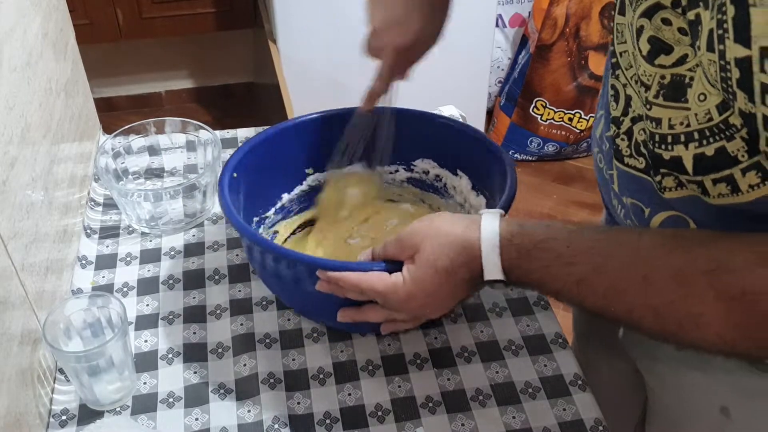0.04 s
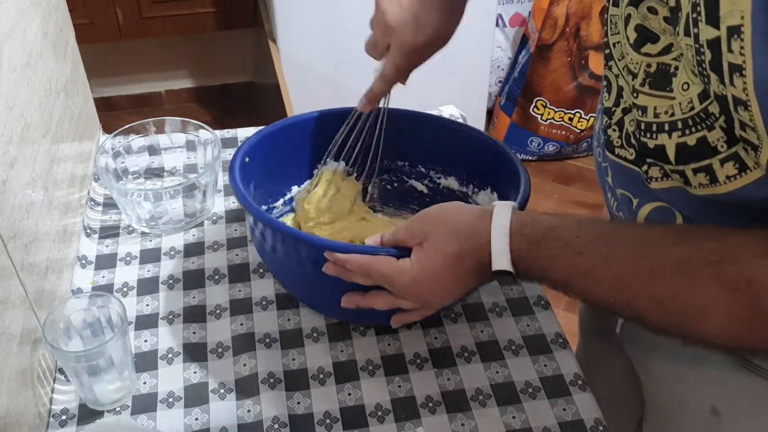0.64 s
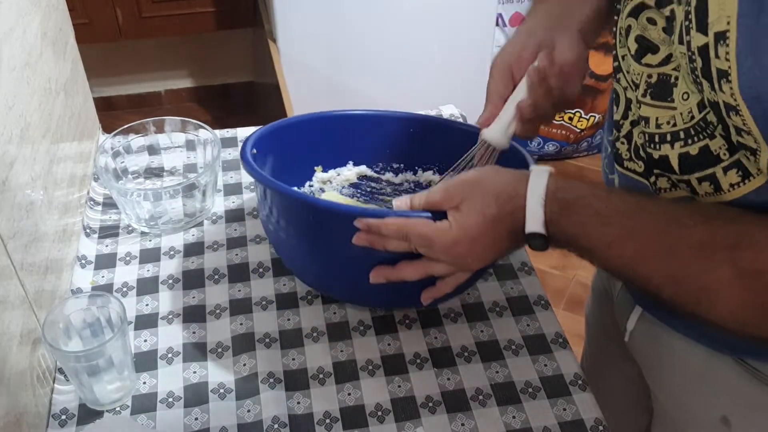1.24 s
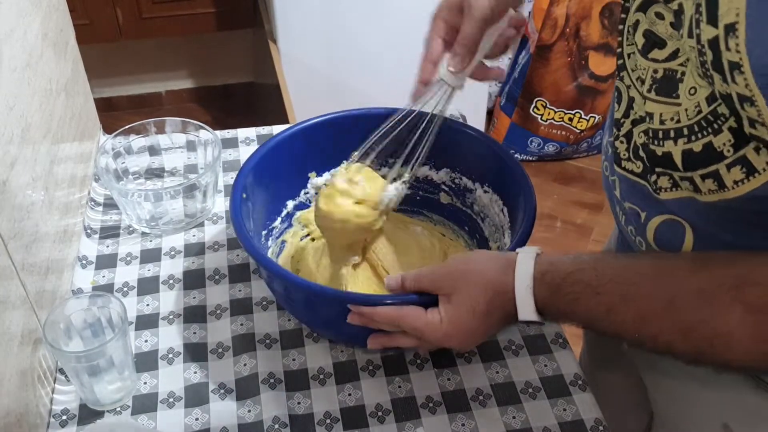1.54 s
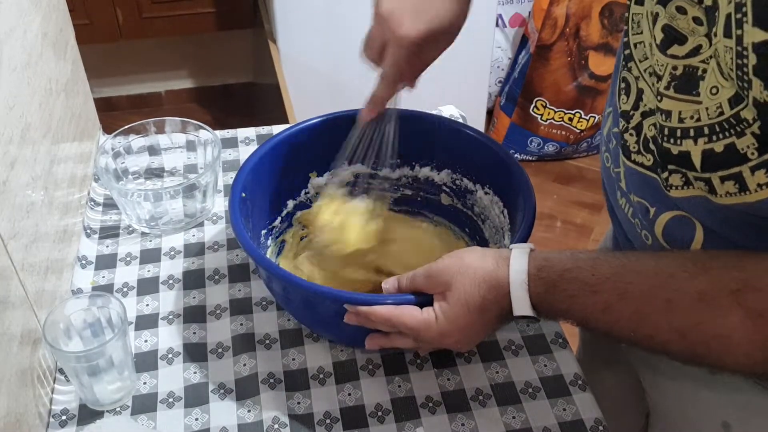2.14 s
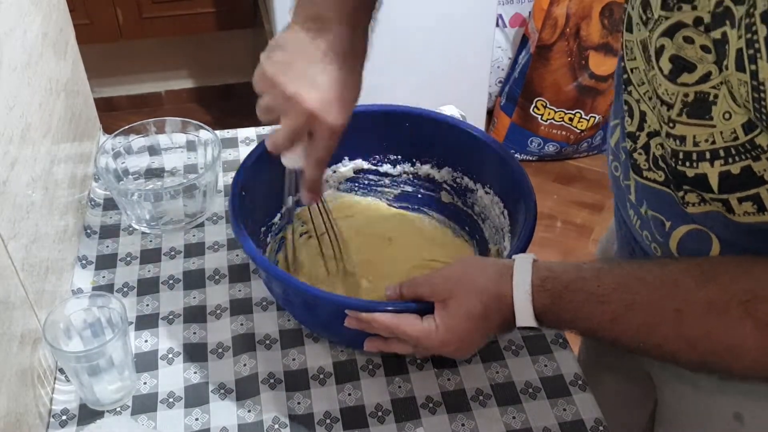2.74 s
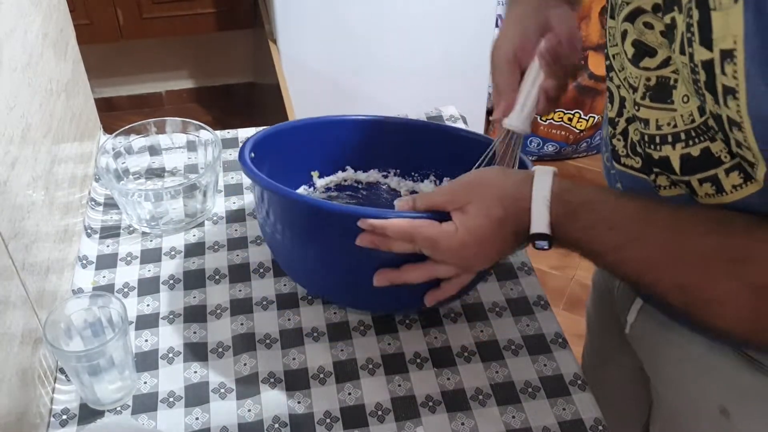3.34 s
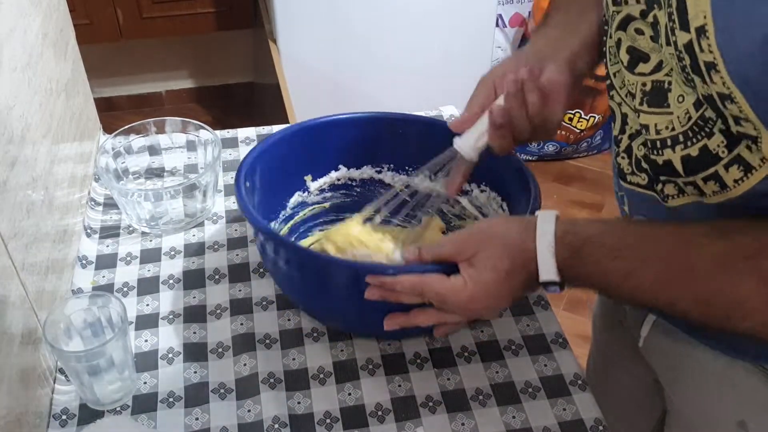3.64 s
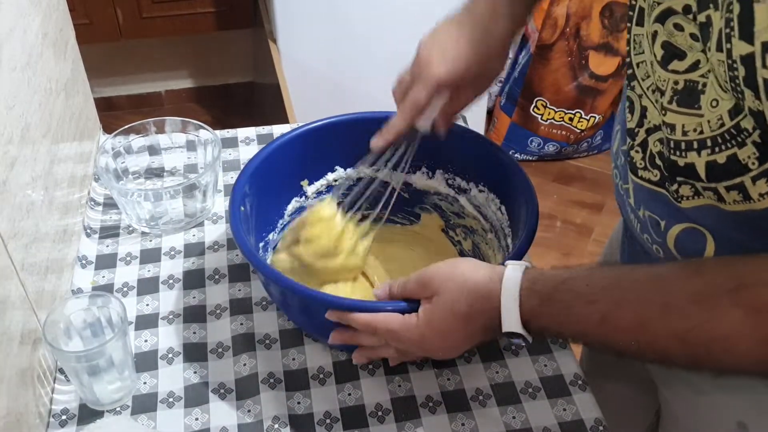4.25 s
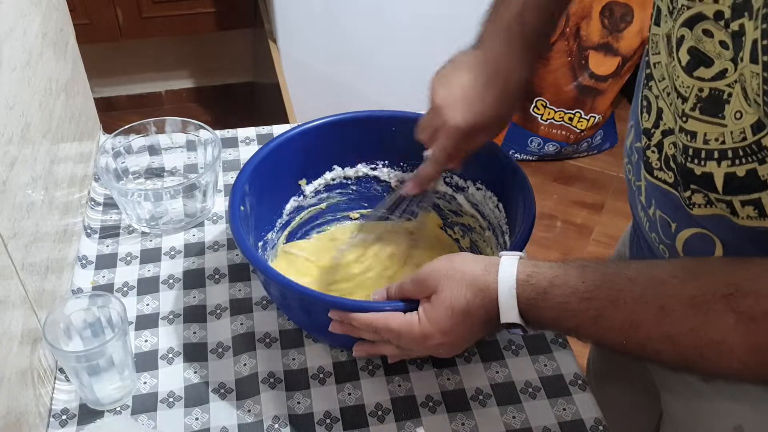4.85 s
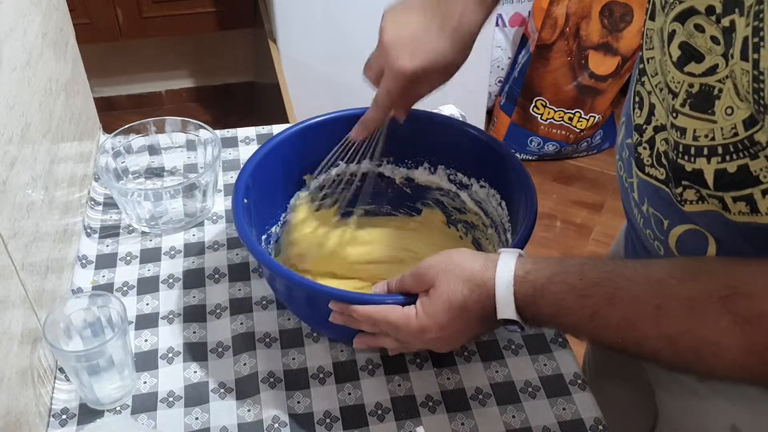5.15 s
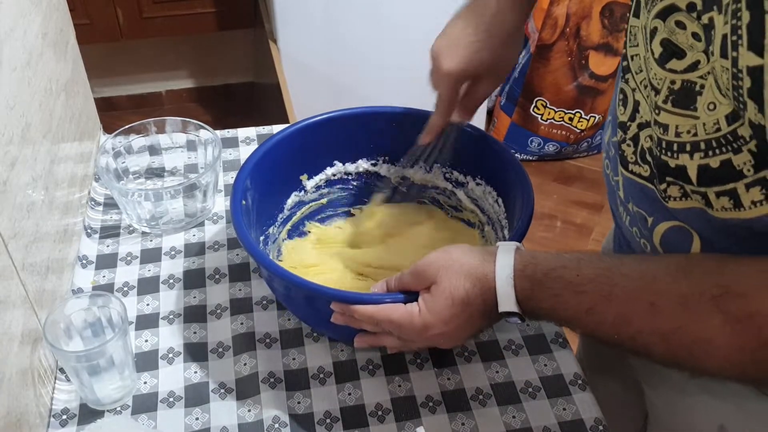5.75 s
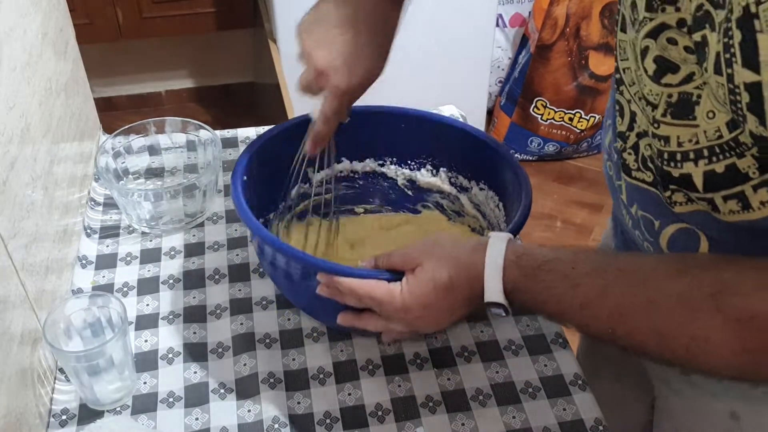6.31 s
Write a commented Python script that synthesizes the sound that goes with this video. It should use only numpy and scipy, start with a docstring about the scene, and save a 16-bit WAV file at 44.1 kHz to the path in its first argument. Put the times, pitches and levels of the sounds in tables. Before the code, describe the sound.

A wire whisk taps, scrapes and squelches through thick batter in a plastic bowl that thuds on a table, over a low hum.

```python
"""A wire whisk works thick batter in a plastic bowl, in a bare kitchen over a low, wavering hum.
First the wires tap and scrape the wall in a flurry, with one hard knock on the rim. Air pockets then
squelch open in the batter, and near 1.6 s the bowl thuds on the table. A second flurry comes near 3 s.
Lighter taps, sticky smacks and more thuds follow, until a last scrape at 6.4 s.
The room reverberates after every blow."""
import sys
import numpy as np
from scipy import signal
from scipy.fft import rfft, irfft
from scipy.io import wavfile
from scipy.ndimage import uniform_filter1d

SR = 44100
rng = np.random.default_rng(int(sys.argv[2]) if len(sys.argv) > 2 else 0)


def output_pcm(signal):
    """Save a mono or channel-first signal as 16-bit PCM at the path in sys.argv[1].

    Samples are clipped to [-1, 1] before scaling.
    """
    pcm = np.clip(np.atleast_2d(signal).T, -1, 1) * 32767
    wavfile.write(sys.argv[1], SR, np.round(pcm).astype(np.int16))


N = 285768
TIME = np.arange(N) / SR
FREQS = np.fft.rfftfreq(8192, 1 / SR)

# room noise: (frequency [Hz], relative level [dB])
AIR_SPECTRUM = [(25, -17.5), (42, 13), (65, 10.5), (100, 8.5), (140, 2), (250, -6), (400, -18), (800, -18),
                (1100, -36.5), (2200, -27), (4000, -34), (6500, -27.5), (8000, -38), (16000, -39)]
# envelope of the hum: (time [s], level [dB])
HUM_LEVELS = [(0, -50), (.72, -50.5), (1.26, -60), (1.9, -50.5), (2.35, -56), (2.55, -64.5), (2.85, -51),
              (3.05, -62.5), (4.05, -70.5), (4.45, -51), (4.7, -70), (5.1, -53), (5.85, -64.5),
              (6.23, -46.5), (6.48, -56.5)]
# reverberation time: (frequency [Hz], t60 [s])
ROOM_T60 = [(60, 1), (200, 0.38), (600, 0.53), (2000, 0.46), (6000, 0.4), (15000, 0.34)]
# starting spectrum of the echoes: (frequency [Hz], relative level [dB])
ECHO_SPECTRUM = [(100, -0.5), (400, -0.5), (3000, -3), (5500, -5), (8000, 3.5), (15000, -3.5)]
# width of the diffuse field: (frequency [Hz], side over mid [dB])
DIFFUSE_WIDTH = [(60, -13.5), (170, -13), (350, -9.5), (700, -4), (1500, 2), (5000, -3), (15000, 1.5)]
# channel balance: (frequency [Hz], left over right [dB])
BALANCE = [(200, 0.15), (1500, -0.8), (4000, -1), (9000, 2.5), (15000, 3.5)]
# hollow resonances of the bowl: (frequency [Hz], width [Hz], boost [dB])
BOWL_MODES = [(208, 39, 1.5), (277, 12, 5.5), (473, 32, 7), (730, 140, 6.5), (870.4, 89, 10.5)]
# hard clack of the knock, then faint tones lingering in the room:
# (frequency [Hz], relative level [dB], t60 [s])
KNOCK_PARTIALS = [(1406, -5.5, 0.0074), (1690, -7, 0.011), (2850, -1.5, 0.0036), (5500, -3, 0.0025),
                  (1440, -27, 0.31), (1474, -32, .2), (1655, -29.5, .2), (1660, -30.5, 0.31),
                  (1860, -27, 0.28), (1958, -38.5, 0.3)]
# base spectrum of each source: (frequency [Hz], relative level [dB])
THUD_SPECTRUM = [(25, -46.5), (45, 2), (90, -0.5), (125, -0.5), (165, 0), (280, -6), (480, -7.5),
                 (800, -27), (1300, -42.5), (4000, -31), (16000, -84)]
SQUELCH_SPECTRUM = [(100, -1.5), (220, 0.5), (500, 2.5), (1100, -2), (2200, -4), (3200, -4.5), (4700, -2),
                    (6800, -7), (8000, -18), (11500, -14.5), (16000, -29.5)]
SCRAPE_SPECTRUM = [(100, -19), (200, -7), (450, -1.5), (800, -12), (1050, -2), (1450, 0), (2400, -2),
                   (3600, -2.5), (4500, -6), (6700, -11.5), (8000, -21), (12000, -19), (16000, -20.5)]
TAP_SPECTRUM = [(60, -18), (200, 8), (500, -4), (1000, -8), (1500, -4.5), (2500, -5.5), (3700, -6),
                (4900, -5), (6500, -7), (8000, -18), (12000, -15), (16000, -18)]
# bowl bumping the table: (time [s], relative level [dB], slap [dB])
BOWL_THUDS = [(0.269, -38.5, -35), (0.694, -40.5, -5), (1.561, -31.5, -14), (1.593, -33, -18),
              (1.647, -35.5, -22), (1.903, -42.5, 4.5), (2.351, -43, -8.5), (2.65, -40.5, -5.5),
              (2.924, -27.5, -27.5), (2.969, -50, 19), (3.852, -30.5, -24), (4.399, -35, -10.5),
              (4.653, -36.5, -28), (4.778, -48.5, 2), (4.948, -49, 23), (5.144, -29.5, -14),
              (5.284, -48.5, 17.5), (5.505, -31, -24.5), (5.685, -38.5, -2), (6.185, -25.5, -14.5),
              (6.199, -32.5, -14.5)]
# whisk strokes: squelching batter, and a high scraping fizz near 0.8 s:
# (start [s], length [s], relative level [dB], tilt about 5 kHz [dB/octave])
WHISK_STROKES = [(0.246, 0.093, -62.5, -2), (0.367, 0.067, -66.5, -1.5), (0.792, 0.059, -43.5, 3.5),
                 (1.12, 0.37, -78.5, -1), (1.584, 0.12, -72.5, -2.5), (1.724, 0.26, -62.5, 1),
                 (1.971, 0.53, -64.5, -.5), (2.762, 0.14, -52.5, 1), (2.942, 0.4, -62, -1.5),
                 (3.4, 0.25, -67.5, 4), (3.807, 0.072, -67.5, -5), (3.981, 0.14, -85, 2),
                 (4.392, 0.32, -69, -3), (4.658, 0.63, -64, -1), (5.458, 0.047, -79.5, -7.5),
                 (5.97, .12, -83, -8.5), (6.11, 0.12, -52.5, 4)]
# batter peeling off the wires: (time [s], level [dB], cavity pitch [Hz], length [s])
BATTER_SMACKS = [(0.628, -63.5, 3070, 0.045), (0.666, -51, 3320, 0.0044), (1.55, -62.5, 5500, 0.015),
                 (2.342, -60.5, 1930, 0.021), (2.474, -63, 6540, 0.009), (3.841, -64.5, 2114, 0.013),
                 (4.189, -68.5, 1590, 0.054), (4.62, -70.5, 4600, 0.12), (4.94, -64.5, 4000, 0.098),
                 (6.065, -58, 2160, 0.068)]
# wires dragged along the wall: (start [s], length [s], relative level [dB])
WALL_STROKES = [(0, 0.18, -45), (0.691, 0.041, -49), (0.836, 0.27, -49.5), (1.16, 0.051, -62),
                (2.619, 0.018, -49), (2.729, 0.45, -54.5), (3.277, 0.23, -62), (3.43, 0.06, -65.5),
                (4.385, 0.092, -62.5), (4.916, 0.11, -66), (5.278, 0.028, -61.5), (6.11, 0.27, -59),
                (6.419, 0.057, -46.5)]
# wires striking the wall:
# (time [s], relative level [dB], flatness [0 one tip, 1 whole whisk], tick [dB], wire ring [Hz])
WIRE_TAPS = [(0.004, -17, 0.83, -5.5, 1330), (0.0423, -18, 0.78, -8, 1830), (0.066, -13, 0.5, -5, 1550),
             (0.086, -10.5, 0.8, -1, 2980), (0.098, -6, 0, -24, 1620), (0.1913, -10, 0, -9.5, 2200),
             (0.2854, -20, 0.53, -30, 1850), (0.6944, -11.5, 0.77, -9, 3600), (0.8359, -11, 0.47, -9, 1430),
             (0.8729, -9, 0, -11, 2860), (0.8787, -12, 0.03, -37, 1390), (0.9824, -12.5, 0.37, -9.5, 1120),
             (1.0428, -14.5, 0.13, -9.5, 4150), (1.0764, -13.5, 0.22, -3.5, 1540),
             (1.2442, -20.5, 0.56, -12, 1590), (1.9001, -27.5, 1, -6, 1875),
             (2.415, -31.5, 0.84, -12, 1530), (2.6516, -15.5, 0.72, -2, 1570),
             (2.8894, -22, 0.52, -3.5, 1330), (2.9694, -10, 0.79, -8.5, 1940),
             (3.0248, -5.5, 0.29, -5.5, 4760), (3.0582, -8, 0.2, -32, 1570), (3.139, -17, 0.2, -10, 3650),
             (3.1984, -21, 0.25, -16, 1590), (3.2215, -20, 0, -20, 1520), (3.4011, -25.5, 0.32, -2, 2650),
             (3.505, -23, 0.35, -24, 3620), (4.284, -30, 0.9, -9.5, 1350),
             (4.4039, -23.5, 0.88, -11.5, 1820), (4.4679, -26.5, 1, -10, 2600),
             (4.8536, -28.5, 0.84, -22, 1540), (4.9135, -24.5, 0.7, -12, 2620),
             (5.2862, -19.5, 0.8, -9.5, 2570), (5.6255, -29, 0.93, -9, 1110),
             (5.6773, -15, 0.8, -10.5, 4060), (5.692, -17.5, 0.67, -9.5, 1860),
             (5.736, -22.5, 0.62, -5.5, 4120), (6.1076, -21.5, 0.93, -4.5, 2030),
             (6.1647, -18.5, 0.61, -4, 1520), (6.4042, -27, 0.76, -6, 1860), (6.4349, -27, 0.86, -13, 1550)]


def amp(db):
    """Decibels to amplitude ratio."""
    return 10 ** (np.asarray(db) / 20)


def unit(x):
    """Normalisation to an rms of one."""
    return x / np.sqrt(np.mean(x ** 2) + 1e-20)


def curve_at(points, hz):
    """Interpolation along a log-frequency axis."""
    freqs, values = np.transpose(points)
    return np.interp(np.log(hz + 1), np.log(freqs + 1), values)


def bump(hz, octaves):
    """A Gaussian peak of height one in log frequency."""
    return np.exp(-(np.log2((FREQS + 1) / hz) / octaves) ** 2)


def resonance(hz, width_hz):
    """A Lorentzian peak of height one."""
    return 1 / (1 + (2 * (FREQS - hz) / width_hz) ** 2)


def add(mix, start_s, sound):
    """Superposition of a sound on the mix."""
    part = mix[max(round(start_s * SR), 0):][:len(sound)]
    part += sound[:len(part)]


def shaped(x, points):
    """Zero-phase filtering by (frequency [Hz], gain [dB]) points."""
    gain = amp(curve_at(points, np.fft.rfftfreq(len(x), 1 / SR)))
    return irfft(rfft(x) * gain, len(x))


def drift(hz):
    """Slow random modulation: smoothed noise of unit rms."""
    knots = uniform_filter1d(rng.standard_normal(8000), size=3)
    return unit(np.interp(TIME * hz * 4, np.arange(len(knots)), knots))


def impulses(samples, per_s):
    """A Poisson process of impulses with Gaussian sizes."""
    return rng.standard_normal(samples) * (rng.random(samples) < per_s / SR)


def grains(per_s, spread_db=3):
    """Heavy-tailed shot noise: many small impulses, a few large."""
    size = amp(spread_db * np.minimum(rng.exponential(1, N), 4))
    return unit(size * impulses(N, per_s))


def stroke(start, length, attack_s, release_db_per_s):
    """The envelope of a push of the hand: linear rise, hold, exponential decay."""
    t = TIME - start
    return np.clip(t / attack_s, 0, 1) * amp(-release_db_per_s * np.maximum(t - length, 0))


def diffuse(mid, side):
    """A diffuse field is coherent at two ears in the bass and much less so in the treble."""
    side = shaped(side, DIFFUSE_WIDTH)
    return np.array([mid + side, mid - side])


def air(level_db=-59):
    """Diffuse noise: the steady rumble and faint hiss of the room."""
    mid, side = (shaped(rng.standard_normal(N), AIR_SPECTRUM) for _ in range(2))
    return amp(level_db) * unit(diffuse(mid, side))


def hum(hz=88, waver_hz=7, flutter_db=-0.5):
    """Random frequency and amplitude modulation make a low tone waver."""
    cycles = np.cumsum(hz + waver_hz * drift(hz=14)) / SR
    tone = np.sin(2 * np.pi * cycles) * amp(flutter_db * drift(hz=21.7))
    return amp(np.interp(TIME, *np.transpose(HUM_LEVELS))) * unit(tone)


def reflections(early, early_s):
    """Reverberation: dense early echoes off bowl and table, then exponential decay band by band."""
    hz = np.fft.rfftfreq(256, 1 / SR)[:, None]
    frame_s = np.arange(260) * 128 / SR
    phases = np.exp(2j * np.pi * rng.random((len(hz), len(frame_s))))
    decay = amp(curve_at(ECHO_SPECTRUM, hz) - 60 * frame_s / curve_at(ROOM_T60, hz))
    tail = signal.istft(phases * decay, nperseg=256)[1]
    t = np.arange(len(tail)) / SR
    tail *= (1 + early * np.exp(-t / early_s)) * np.minimum(t / 0.0005, 1)
    return tail / np.linalg.norm(tail)


def kitchen(x, wet_db, early, early_s, places, circles_per_s=2.4):
    """Echoes depend on source position, so they crossfade as the whisk circles the bowl."""
    out = np.array([x, np.r_[np.zeros(3), x[:-3]]])  # direct sound reaches the left first
    position = TIME * circles_per_s * places
    for k in range(places):
        weight = np.sqrt(np.maximum(1 - abs((position - k) % places - 1), 0))
        echoes = diffuse(reflections(early, early_s), reflections(early, early_s))
        out += amp(wet_db) * signal.fftconvolve((x * weight)[None], echoes, axes=1)[:, :N]
    return out


def bowl_response(spectrum_db, low_hz, high_hz, detune=1):
    """Minimum-phase impulse response of a spectrum plus the bowl's modes, of unit energy in a band."""
    modes_db = sum(db * resonance(hz * detune, width) for hz, width, db in BOWL_MODES)
    gain = amp(spectrum_db + modes_db)
    gain /= np.sqrt(np.mean(gain ** 2 * (FREQS > low_hz) * (FREQS < high_hz)))
    # folding the cepstrum makes the response causal
    cepstrum = irfft(np.log(gain + 1e-9))
    cepstrum[1:len(FREQS) - 1] *= 2
    cepstrum[len(FREQS):] = 0
    return irfft(np.exp(rfft(cepstrum)))[:len(FREQS)]


def thuds(gain_db=20, slap_limit_db=11.5):
    """Impact excites resonance: batter slumps, the bowl bumps and the table booms briefly."""
    out = np.zeros(N)
    table_db = 9 * resonance(hz=92, width_hz=18)
    for start, db, slap in BOWL_THUDS:
        plop = 6 + 0.68 * min(slap, slap_limit_db)  # a sharper slap also plops more
        tone_db = curve_at([(110, 0.038), (170, plop), (270, plop), (420, slap + 3)], FREQS)
        thud = bowl_response(curve_at(THUD_SPECTRUM, FREQS) + table_db + tone_db, 60, 250)
        add(out, start, amp(db + gain_db) * thud)
    return out


def squelch_and_fizz(gain_db=-6, clump_db=4.5, settling_db=-102):
    """Shot noise in bands: air pockets of many sizes pop in the batter; near 0.8 s, a scraping fizz."""
    out = np.zeros(N)
    pushes = [(stroke(start, length, attack_s=0.085, release_db_per_s=172), db, tilt)
              for start, length, db, tilt in WHISK_STROKES]
    for hz in np.geomspace(450, 13000, 9):
        band_db = 22 * (bump(hz, octaves=0.6) - 1)
        pop = bowl_response(curve_at(SQUELCH_SPECTRUM, FREQS) + band_db, hz / 1.25, hz * 1.25)
        octaves = np.log2(hz / 5000)
        stirring = amp(settling_db) + sum(push * amp(db + tilt * octaves) for push, db, tilt in pushes)
        crackle = grains(per_s=580) * unit(amp(clump_db * drift(hz=19)))
        band_gain = 2 ** (octaves / 2) * amp(curve_at(SQUELCH_SPECTRUM, hz))  # higher bands are wider
        out += signal.oaconvolve(crackle * stirring * band_gain, pop)[:N]
    return amp(gain_db) * out


def smacks(cavity_db=15):
    """Film rupture: batter tears in a swelling run of pops that excite one small cavity."""
    out, t = np.zeros(N), np.arange(SR // 4) / SR
    for start, db, hz, length in BATTER_SMACKS:
        tears = unit(impulses(len(t), per_s=1800))
        swell = (1.5 * t / length * np.exp(1 - 1.5 * t / length)) ** 2
        spectrum_db = curve_at(SQUELCH_SPECTRUM, FREQS) + cavity_db * bump(hz, octaves=0.5)
        pop = bowl_response(spectrum_db, 0, SR)
        add(out, start, amp(db) * signal.fftconvolve(tears * swell, pop))
    return out


def scrape(gain_db=-3, catch_db=3, ring_db=5, wires=5):
    """Stick-slip friction: each wire catches on the plastic in clumps and rings at its own pitch."""
    out = np.zeros(N)
    pressure = sum(amp(db) * stroke(start, length, attack_s=0.038, release_db_per_s=134)
                   for start, length, db in WALL_STROKES)
    for hz in np.geomspace(900, 5000, wires):
        slips = grains(per_s=300) * unit(amp(catch_db * drift(hz=40.87)))
        spectrum_db = curve_at(SCRAPE_SPECTRUM, FREQS) + ring_db * bump(hz, octaves=0.12)
        click = bowl_response(spectrum_db, 1000, 4000, detune=rng.uniform(0.94, 1.06))
        out += signal.oaconvolve(slips * pressure, click)[:N]
    return amp(gain_db) * out / np.sqrt(wires)


def rim_knock(start_s=0.086, gain_db=-3.5, cutoff_hz=1100):
    """Damped sinusoids: the hard clack of the knock and faint tones lingering in the room after it."""
    out, t = np.zeros(N), np.arange(SR // 3) / SR
    tones = sum(amp(db - 60 * t / t60) * np.sin(2 * np.pi * hz * t) for hz, db, t60 in KNOCK_PARTIALS)
    onset = 1 - np.exp(-t / 0.0002)
    # the knock carries little bass
    high_pass = signal.butter(2, cutoff_hz, "high", fs=SR, output="sos")
    add(out, start_s, amp(gain_db) * signal.sosfilt(high_pass, tones * onset))
    return out


def taps(gain_db=-2.5, ring_db=5, travel_s=0.00092, chatter_s=0.0069, echo_s=0.005, echo_db=-5):
    """Impact and echo: one wire strikes the wall while its neighbours chatter, and a near surface throws the
    click back about 5 ms later."""
    out, t = np.zeros(N), np.arange(SR // 16) / SR
    # dispersion: bending waves carry treble ahead of bass along the wire, smearing the click
    landing = unit(irfft(np.exp(-4j * np.pi * travel_s * np.sqrt(FREQS * 1000)))[:len(t)])
    for start, db, flatness, tick, hz in WIRE_TAPS:
        # a flatter landing sounds more of the bowl and sets more wires chattering
        body = np.interp(flatness, [0, 1], [-11, 8])
        chatter = np.interp(flatness ** 3, [0, 1], [0.12, 4.1])
        rattle = impulses(len(t), per_s=1600) * t * np.exp(-2 * t / chatter_s)
        force = landing + chatter * unit(shaped(rattle, [(3000, 0.0034), (10000, -3)]))
        add(force, echo_s * rng.uniform(0.85, 1.15), amp(echo_db) * landing)
        force /= np.linalg.norm(force)
        # a wire coated in batter has a weak tick and loses its very top most
        tone = [(200, body - 6), (450, body), (750, body), (1200, 0), (3600, 0.0047),
                (6500, tick + 6), (14000, 1.6 * tick + 6)]
        wire_db = curve_at(tone, FREQS) + ring_db * bump(hz, octaves=0.36)
        detune = 1 + 0.016 * rng.uniform(-1, 1)  # grip and batter load shift the bowl's modes
        click = bowl_response(curve_at(TAP_SPECTRUM, FREQS) + wire_db, 1000, 4500, detune)
        add(out, start, amp(db + gain_db) * signal.fftconvolve(force, click))
    return out


def scene():
    """Superposition: whisk, batter and bowl with their echoes, over the hum and room noise."""
    tapping = kitchen(taps(), wet_db=0, early=1.3, early_s=0.039, places=5)
    whisking = scrape() + squelch_and_fizz() + smacks()
    stirring = kitchen(whisking, wet_db=0, early=0.93, early_s=0.045, places=3)
    thudding = kitchen(thuds(), wet_db=2, early=0.86, early_s=0.056, places=3)
    clack = kitchen(rim_knock(), wet_db=-5.5, early=4.3, early_s=0.014, places=2)
    return tapping + stirring + thudding + clack + hum() + air()


def record(dry, cutoff_hz=16050):
    """Linear filtering: two microphones of slightly unequal colour, then a band limit."""
    left = shaped(dry[0], [(hz, db / 2) for hz, db in BALANCE])
    right = shaped(dry[1], [(hz, -db / 2) for hz, db in BALANCE])
    low_pass = signal.firwin(511, cutoff_hz, window=("kaiser", 9), fs=SR)
    return signal.oaconvolve(np.array([left, right]), low_pass[None], "same", axes=1)


dry = scene()
out = record(dry)
output_pcm(out)
```